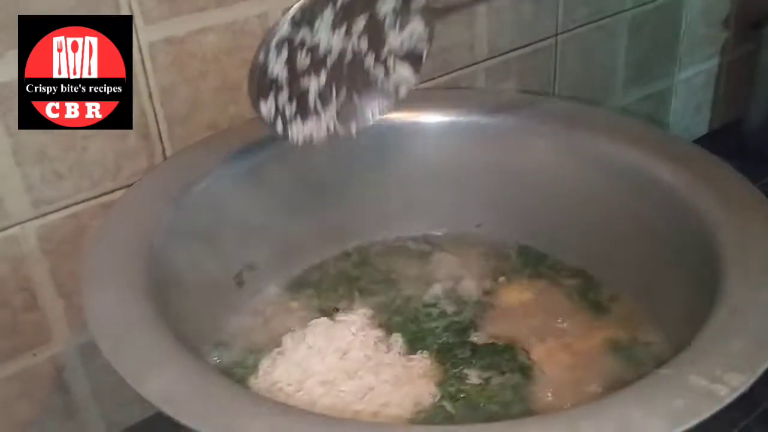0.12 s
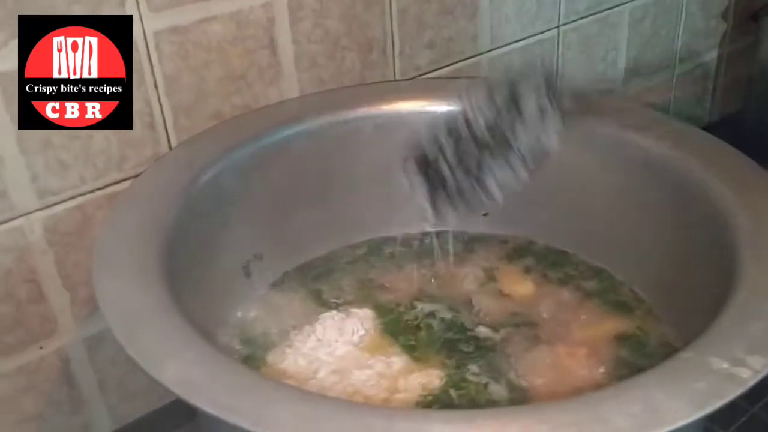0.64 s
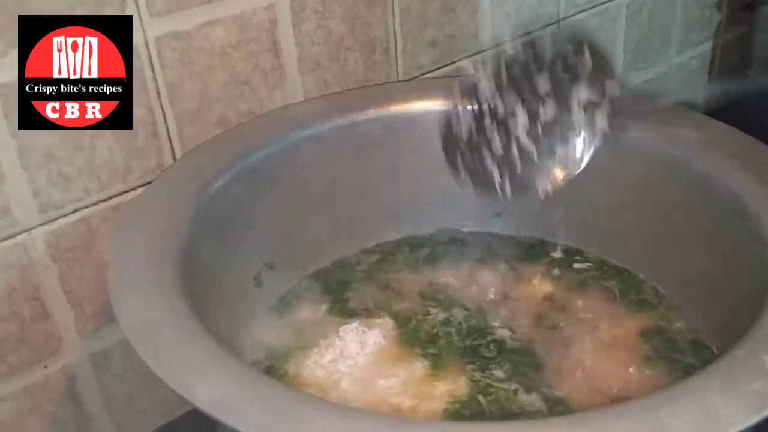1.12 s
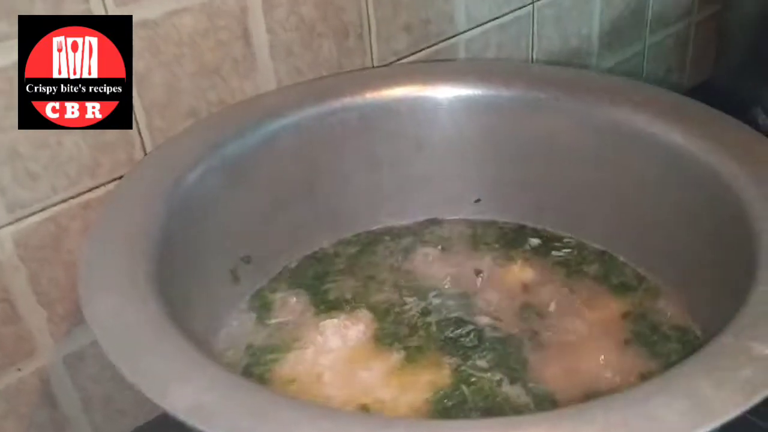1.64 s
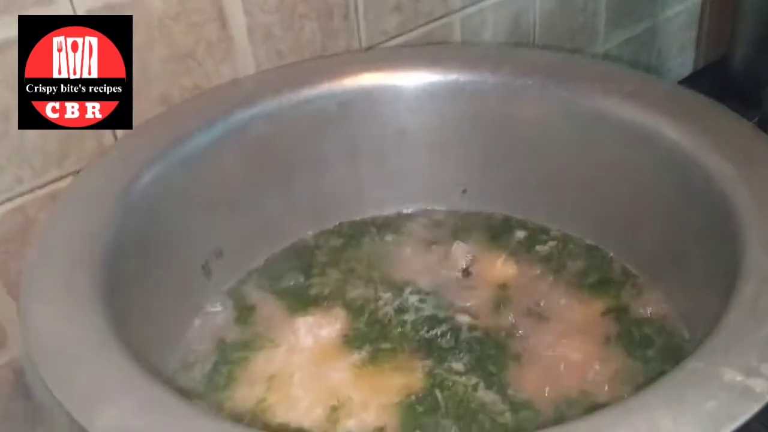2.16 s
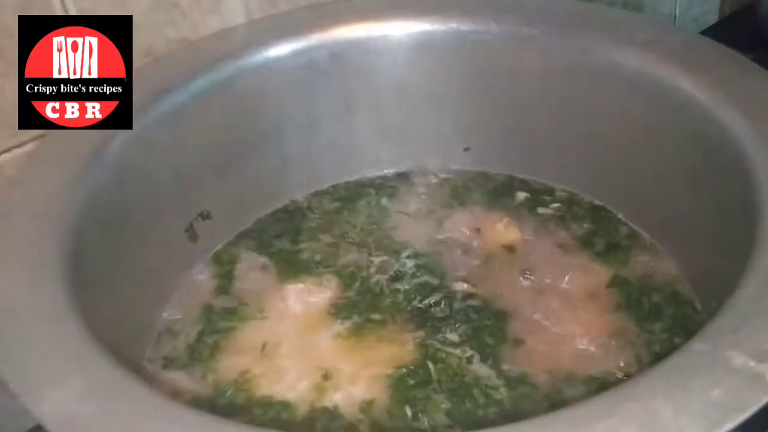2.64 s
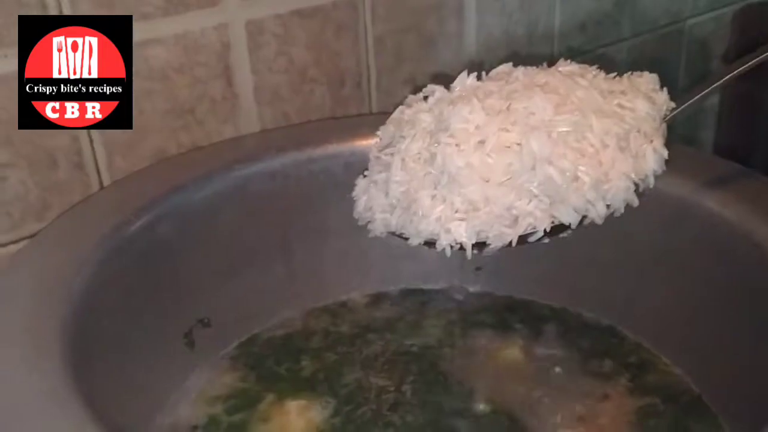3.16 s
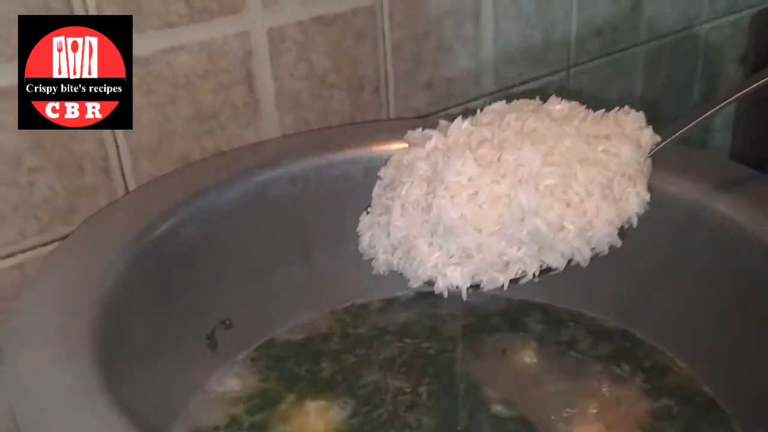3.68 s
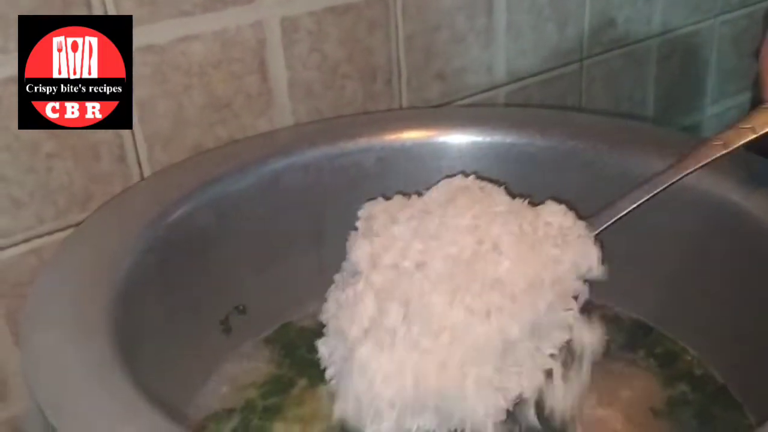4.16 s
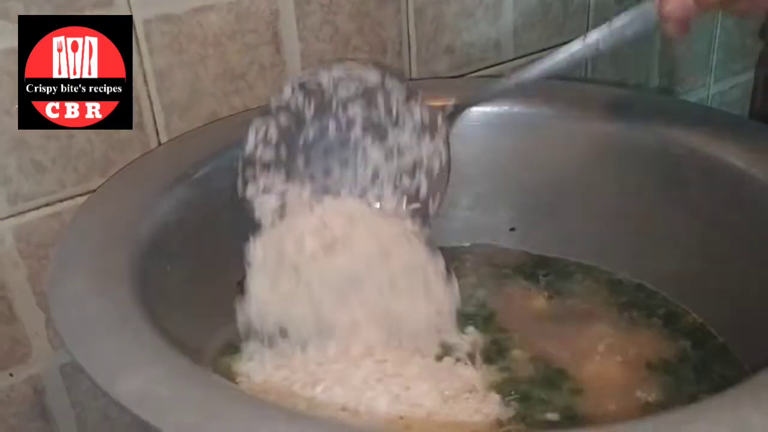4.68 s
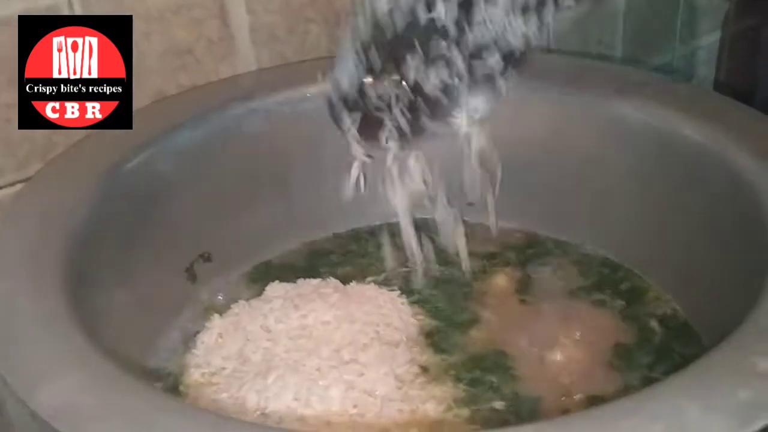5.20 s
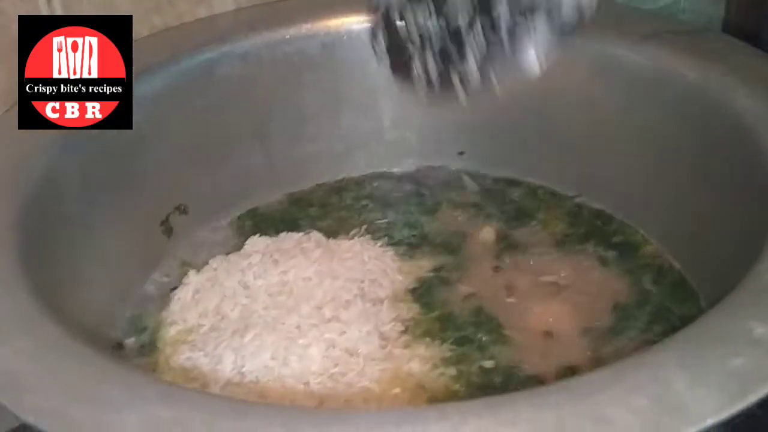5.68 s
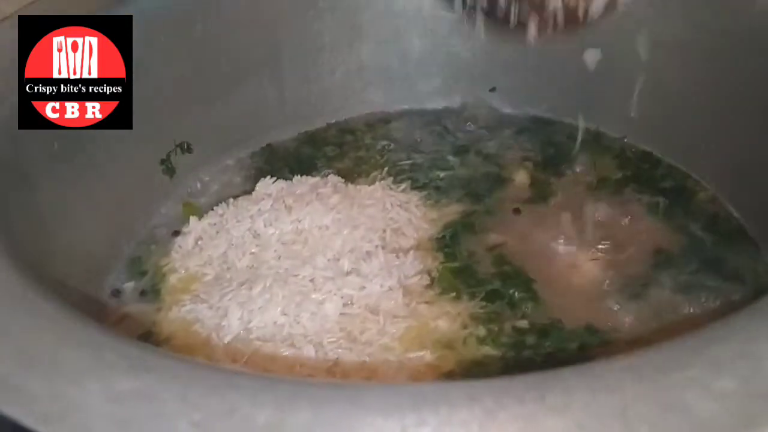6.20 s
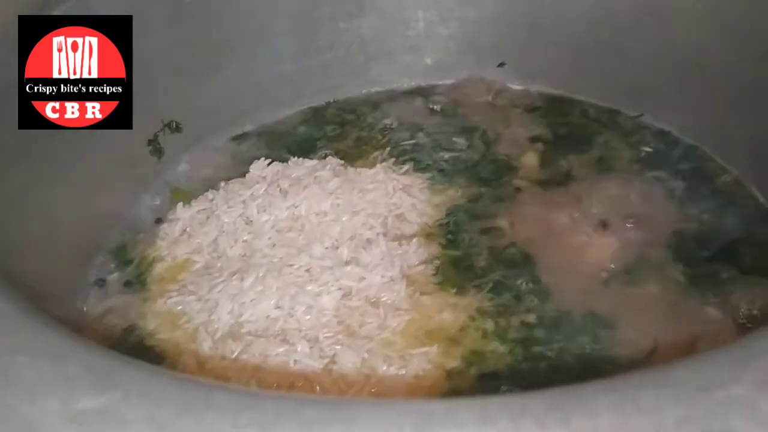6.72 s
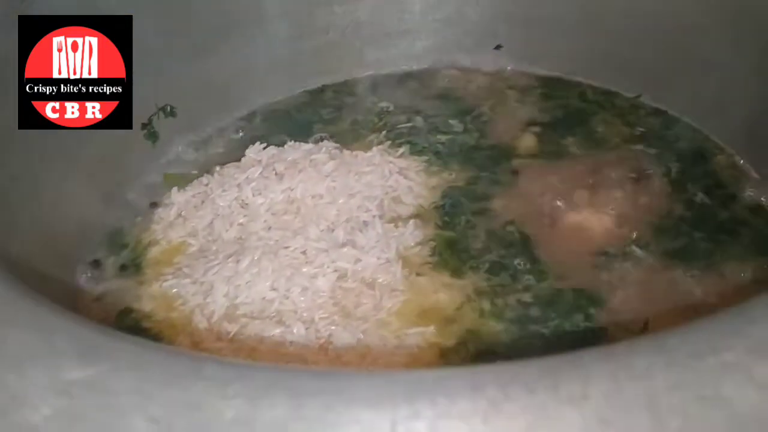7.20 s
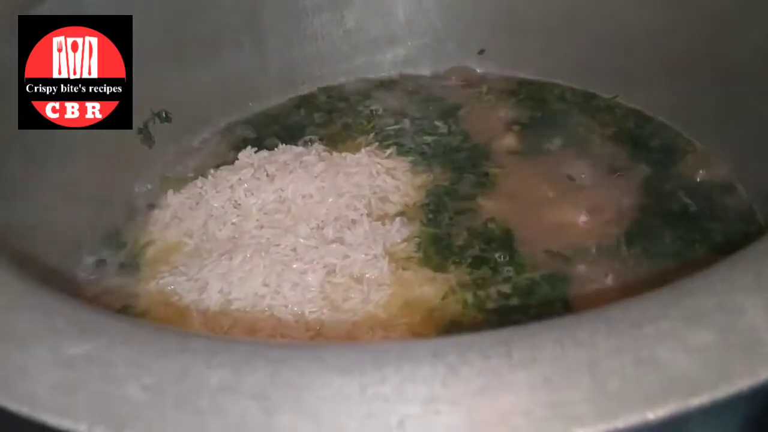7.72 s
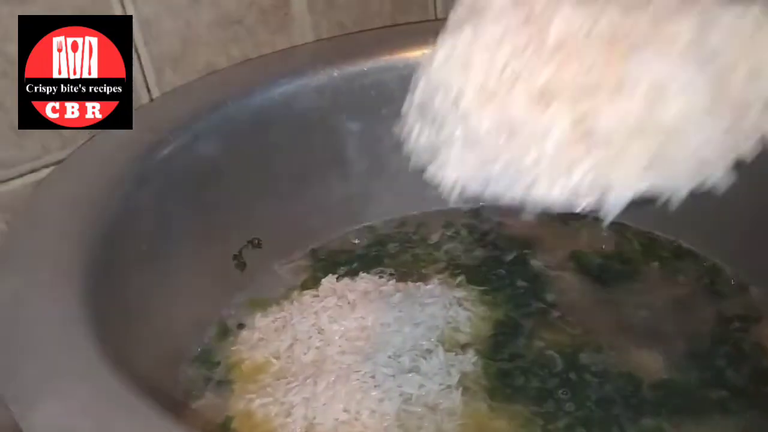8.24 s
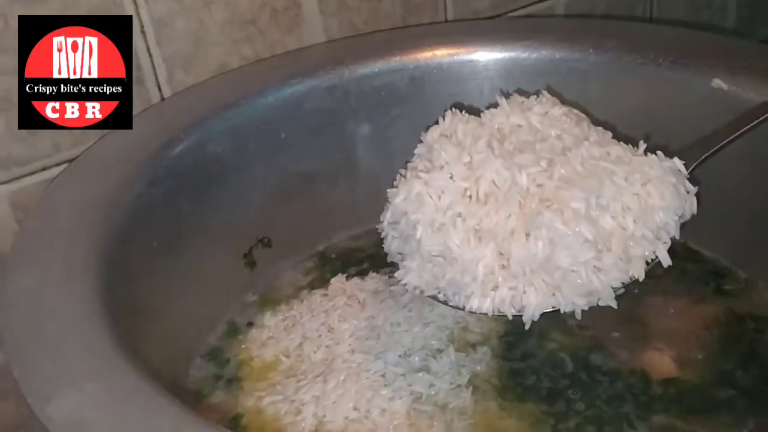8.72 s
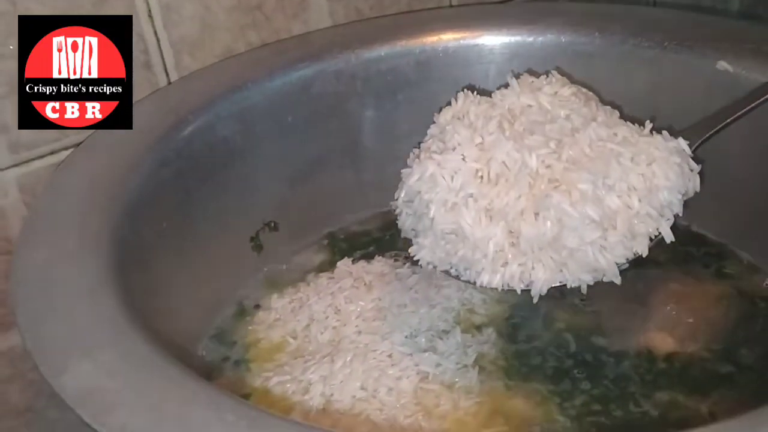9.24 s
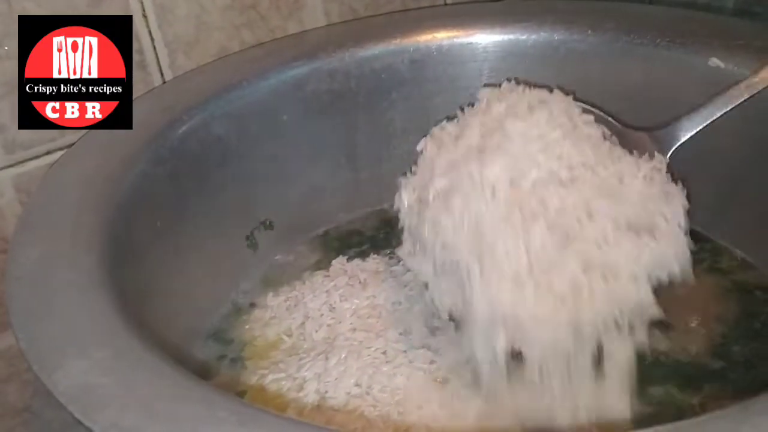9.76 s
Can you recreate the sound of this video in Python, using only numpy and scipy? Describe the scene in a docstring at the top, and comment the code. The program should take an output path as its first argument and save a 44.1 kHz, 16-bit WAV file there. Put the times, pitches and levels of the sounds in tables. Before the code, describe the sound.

A close microphone in a tiled kitchen hears a steady soft gas-flame roar and a low 100 Hz motor hum with moving air. Small rising plops of rice in broth come at 0.35-0.75 s. At 0.93 and 1.15 s a ladle raps a wide metal pot, very loud, bright and long-ringing with beating overtones; weaker touches follow until 1.5 s. At 2 s a sharp knock on a bowl, a plop, then from 2.3 to 3 s grainy scraping, booming and rough squeaks. Two dull thumps bump the microphone at 3.3 s. Rice slides off with dry hisses around 4.2-4.8 and 5.3-5.5 s, with a thin metallic rub. The hum dies quickly after 5.55 s. Rapid loud clangs ring from 5.8 to 6.4 s, air fading afterwards. Another bowl knock and scrape come at 7.0-7.9 s, ending abruptly. Quiet flame, ticking grains, faint plops, a brief low tone and a small spill finish by 9.9 s.

```python
"""A wide metal pot simmers on a gas burner in a tiled kitchen; a ladle raps its rim and beating modes ring out.
The flame is coloured noise; a motor nearby adds hum, narrow noise and moved air, then runs down.
The ladle digs rice from a bowl, knocks and drags on its wall: noise cracks, damped modes and stick-slip booms.
Rice hisses and ticks as random clicks and noise, clumps plop as rising sines; thumps reach the microphone's body.
The recorder's limiter ducks the whole kitchen under the loud raps."""
import sys
import numpy as np
from scipy import signal
from scipy.fft import rfft, irfft, next_fast_len
from scipy.io import wavfile
from scipy.ndimage import uniform_filter1d, map_coordinates

SR = 44100
rng = np.random.default_rng(int(sys.argv[2]) if len(sys.argv) > 2 else 0)


def linear_from_db(decibels):
    """Turn decibels (scalar or array-like) into linear amplitude factors; 0 gives 1."""
    return 10 ** (np.asarray(decibels, float) / 20)


def digitize_waveform(pressure):
    """Quantize a signal to 16-bit integers and store it at the path in sys.argv[1].

    Rows of a 2-D input are taken as channels; values are limited to [-1, 1].
    """
    field = np.atleast_2d(pressure).T
    bounded = np.clip(field, -1, 1)
    quanta = np.round(bounded * 32767).astype(np.int16)
    wavfile.write(sys.argv[1], SR, quanta)


N = 435266


def rms_one(x):
    """Scale to rms 1."""
    return x / np.sqrt(np.mean(x ** 2) + 1e-20)


def gains(*tables):
    """Level columns as gains in time, silent outside the tables."""
    t, out = np.arange(N) / SR, 0
    for rows in tables:
        s, *columns = np.transpose(rows)
        inside = (t >= s[0]) * (t <= s[-1])
        out = out + np.array([linear_from_db(np.interp(t, s, level_db)) * inside for level_db in columns])
    return out


def colour(x, spectrum):
    """Give a dense signal a spectrum, interpolated over log frequency; rms 1."""
    hz, level_db = np.transpose(spectrum)
    size = next_fast_len(len(x))
    log_hz = np.log(np.maximum(np.arange(size // 2 + 1) * SR / size, 1))
    shape = linear_from_db(np.interp(log_hz, np.log(hz), level_db))
    return rms_one(irfft(rfft(x, size) * shape, size)[:len(x)])


def noise(count=N):
    """White noise."""
    return rng.standard_normal(count)


def drift(rate):
    """Slow chance from normal knots of spread 1, rate knots per second."""
    knots = rng.standard_normal(400)
    return map_coordinates(knots, [np.arange(N) / SR * rate], order=3, mode="mirror")


def flutter(depth_db, per_s, count, size):
    """An uneven gain of its own for each mode; mean power over all modes 1."""
    knots = rng.standard_normal((count, 100))
    at = np.arange(size) / SR * per_s
    gain = linear_from_db(depth_db * np.array([np.interp(at, np.arange(100), row) for row in knots]))
    return gain / np.sqrt(np.mean(gain ** 2))


def resonate(x, hz, width_hz):
    """A resonance with gain about 1 on top."""
    r = np.exp(-np.pi * width_hz / SR)
    feedback = [1, -2 * r * np.cos(2 * np.pi * hz / SR), r * r]
    return signal.lfilter([(1 - r * r) / 2, 0, (r * r - 1) / 2], feedback, x)


def narrow_noise(hz, width_hz, count=N):
    """Noise twice through one resonance; rms 1."""
    return rms_one(resonate(resonate(noise(count), hz, width_hz), hz, width_hz))


def dying(t60, seconds):
    """An exponential fall of 60 dB in t60."""
    return linear_from_db(-60 * np.arange(round(seconds * SR)) / SR / t60)


def swell(s, rise_s, fall_s):
    """A gain that climbs 20 dB in rise_s to 1 at time s and falls 20 dB in fall_s."""
    t = np.arange(N) / SR - s
    return linear_from_db(-20 * np.where(t < 0, -t / rise_s, t / fall_s))


def grains(per_s, spread_db):
    """Random clicks of uneven size and sign."""
    sizes = linear_from_db(spread_db * np.minimum(rng.exponential(1, N), 5)) * rng.choice([-1, 1], N)
    return sizes * (rng.random(N) < per_s / SR)


def add(out, s, x):
    """Mix x into out from time s."""
    i = round(s * SR)
    out[i:i + len(x)] += x[:N - i]


def kitchen(x, t60, level_db):
    """Tiled walls: a dense tail after a 5 ms gap, duller than the source."""
    tail = signal.lfilter([.5], [1, -.45], noise(SR // 2)) * dying(t60, .5)
    tail = np.r_[np.zeros(SR // 200), tail / np.sqrt(np.sum(tail ** 2))]
    return x + linear_from_db(level_db) * signal.oaconvolve(x, tail)[:N]


# the motor's hum, running down after the last row: time_s, level_db
MOTOR_HUM = [(0, -31), (1.0, -32), (1.9, -31.5), (2.601, -28), (3.4, -25), (4.5, -25), (5.55, -26.5)]
# the wavering tone swells again alone: time_s, level_db
TONE_RETURNS = [(9.6, -56), (9.74, -29), (9.87, -34)]
# level of the moved air: time_s, level_db
MOVED_AIR = [(0, -33.5), (1.8, -31), (3.0, -32.5), (3.5, -35), (4.3, -34), (5.1, -35.5), (5.55, -27.5),
             (5.9, -33.5), (6.3, -25.5), (6.65, -43)]
# spectrum of the moved air: frequency_hz, density_db (per Hz)
AIR_SPECTRUM = [(24, -59), (40, -14), (68, -9), (103, 7), (179, 3.5), (218, -7.5), (350, -14), (438, -4),
                (817, -19), (1600, -10.5), (2330, -4.5), (3930, -24.5), (5580, -23.5), (8110, -43),
                (15500, -38)]


def motor():
    """A magnetic hum with a wavering tone and a whine, dying once switched off, and moved air."""
    s, hum_db = np.transpose(MOTOR_HUM)
    t = np.arange(N) / SR
    run_down_db = 63 * np.maximum(t - s[-1], 0)   # 63 dB per second
    running = linear_from_db(np.interp(t, s, hum_db) - run_down_db)
    hum_hz = 100.1 + 0.86 * drift(6)
    hum = np.sin(2 * np.pi * np.cumsum(hum_hz) / SR) * linear_from_db(0.74 * drift(18))
    whine = linear_from_db(-19) * narrow_noise(2316, width_hz=39)
    tone_gain = running * linear_from_db(-8.5) + gains(TONE_RETURNS)[0]
    tone = tone_gain * narrow_noise(169.74, width_hz=9.3)
    air = gains(MOVED_AIR)[0] * colour(noise(), AIR_SPECTRUM)
    return running * (hum + whine) + tone + air


# flame and simmer: time_s, level_db
BURNER_LEVEL = [(0, -35), (.7, -30.5), (2.1, -33.5), (2.55, -26.5), (3.05, -34), (3.4, -31), (5.6, -30),
                (6.9, -35), (7.45, -29.5), (8.3, -34), (9.87, -32.5)]
# spectrum of the roar: frequency_hz, density_db (per Hz)
FLAME_SPECTRUM = [(18, -89), (30, -30), (69, -32), (88, -2.5), (164, -1), (213, -6), (324, 0.5), (420, -7),
                  (1260, -10.5), (2300, -14), (2690, -12), (3320, -28), (6210, -36.5), (8500, -44.5),
                  (15500, -34.5)]
# faint whistles of the gas jets: pitch_hz, width_hz (of each of two passes), level_db
WHISTLES = [(2717, 37, -53), (3073, 120, -52.5), (6150, 53, -62)]


def burner():
    """The flame's roar, noise that flickers slightly, and its whistles, narrow noise."""
    roar = gains(BURNER_LEVEL)[0] * linear_from_db(0.9 * drift(9)) * colour(noise(), FLAME_SPECTRUM)
    return roar + sum(linear_from_db(db) * narrow_noise(hz, width_hz) for hz, width_hz, db in WHISTLES)


# thin fall of grains: time_s, level_db
TRICKLE = [(0, -46), (.9, -49.5), (1.6, -46.5), (3.04, -51.5), (3.06, -76), (3.3, -48), (4.0, -46.5),
           (5.25, -51), (5.8, -51), (7.0, -50), (8.5, -50), (9.87, -49.5)]
# spills, many grains at once: height_s, level_db, rise_s, fall_s (rise and fall over 20 dB)
SPILLS = [(.48, -48, 0.064, 0.46), (3.40, -58, .2, 0.41), (4.13, -49, .03, 0.16), (4.24, -39.5, 0.1, 0.38),
          (4.60, -47, 0.034, 0.13), (4.74, -38, 0.17, 0.27), (5.30, -40, 0.018, 0.11),
          (5.37, -39, 0.078, 0.089), (5.51, -39, 0.012, 0.37), (9.83, -45.5, 0.049, 0.16)]
# single grains ticking on metal: start_s, level_db, centre_hz
TICKS = [(.573, -26, 5000), (1.536, -26, 3500), (3.192, -33, 5140), (3.266, -33, 5200), (3.74, -26.5, 5470),
         (4.220, -28, 12500), (4.497, -36, 12500), (4.733, -24, 6500), (4.898, -27, 4770),
         (5.291, -37, 9000), (5.360, -27, 12500), (5.417, -41, 12000), (8.625, -38, 4850),
         (8.692, -40, 5600), (8.796, -38, 5100), (8.919, -33, 4870), (9.575, -39, 4700), (9.652, -35, 4960),
         (9.715, -35, 5000), (9.776, -36, 5000), (9.828, -31, 5000)]
# clumps dropping in the broth: start_s, peak_db, pitch_hz (at the start)
PLOPS = [(0.351, -22.5, 930), (0.572, -26, 910), (0.609, -15.5, 884), (0.651, -23.5, 940),
         (0.731, -23, 964), (2.088, -17, 960), (8.387, -38, 1020), (8.916, -36, 1250), (9.096, -33, 1240),
         (9.506, -34, 1010), (9.656, -26, 900)]
# spectrum of sliding grains: frequency_hz, density_db (per Hz)
SLIDE_SPECTRUM = [(1470, -36), (2500, -16.5), (3370, 1), (4080, -8), (5490, -1.5), (8100, -20),
                  (9580, -23.5), (12400, -13.5), (15500, -28)]


def rice():
    """Grains hiss off the ladle, some tick alone; clumps plop, rising a little in pitch."""
    patter = grains(4000 * linear_from_db(3 * drift(25)), spread_db=3.8)
    spilling = sum(linear_from_db(db) * swell(s, rise_s, fall_s) for s, db, rise_s, fall_s in SPILLS)
    flow = gains(TRICKLE)[0] + spilling
    tick = dying(t60=.035, seconds=0.054)
    strays = np.abs(linear_from_db(-52.5) * grains(per_s=12, spread_db=1.6))
    stray_gain = signal.oaconvolve(strays, tick)[:N]
    out = flow * colour(patter, SLIDE_SPECTRUM) + stray_gain * colour(noise(), SLIDE_SPECTRUM)
    for s, level_db, hz in TICKS:
        grain = rms_one(resonate(noise(len(tick)), hz, width_hz=.15 * hz))
        add(out, s, linear_from_db(level_db) / 2 * tick * grain)   # halved, as noise peaks well above its rms
    t = np.arange(SR // 10) / SR
    for s, peak_db, hz in PLOPS:
        add(out, s, linear_from_db(peak_db) * np.sin(2 * np.pi * hz * t * (1 + 0.79 * t)) * dying(0.061, .1))
    return out


# raps on the rim: start_s, level_db, spot (0-2), crack_db, ring_left (share of earlier ringing kept)
RAPS = [(0.9326, 12, 0, -9.5, .9), (1.146, 12, 0, -12, 0.24), (1.298, -2.5, 2, -36, 1),
        (1.476, -22, 2, -33, 0.94), (1.536, -28, 2, -34, 0.35), (5.784, 11, 1, -11.5, .9),
        (5.958, 9, 2, -4, 0.22), (6.02, 4, 2, -19, 0.19), (6.069, 1.5, 2, -20, 0.48),
        (6.142, 12.5, 2, -3, 0.43), (6.203, -10, 2, -11, 0.6), (6.3780, -10, 2, -20.5, 0.48)]
# pot modes: pitch_hz, spot_0_db, spot_1_db, spot_2_db (all relative), t60_s (before a common stretch)
POT_MODES = [(140, -34, -30, -24, 0.18), (320, -34, -28, -22, 0.18), (982, -17.5, -18, -21, 1.15),
             (1217, -26, -29, -22, 0.8), (1349, -21, -31, -35, 0.91), (1523, -23, -30, -25, 0.9),
             (1647, -11, -14, -17, 1.3), (1760, -20, -21, -33, 0.84), (1820, -34, -30, -23, .8),
             (1873, -17, -14, -24, 1.05), (1900, -18, -15, -27, 1.05), (2073, -32, -33, -35, 0.8),
             (2215, -16, -14, -15, 0.9), (2290, -21, -26, -16, 0.85), (2390, -26, -33, -30, 0.85),
             (2511, -19, -23, -29, 0.95), (2606, -28, -32, -38, 0.75), (2686, -31, -40, -35, 0.74),
             (2791, -26, -25, -38, 0.73), (2990, -31, -32, -28, 0.72), (3381, -38, -55, -38, 0.69),
             (3825, -48, -49, -42, 0.67), (4325, -47, -48, -40, 0.64), (4858, -34, -30, -40, 0.62),
             (5128, -33, -30, -41, 0.61), (5421, -32, -41, -39, 0.6), (5652, -46, -55, -52, 0.59),
             (5852, -45, -53, -52, 0.59), (6013, -46, -48, -40, 0.58), (6646, -36, -44, -49, 0.57),
             (7300, -52, -55, -44, 0.55), (7992, -54, -52, -46, 0.54), (8710, -53, -55, -49, 0.52),
             (9475, -52, -53, -49, 0.51), (10280, -66, -64, -53, 0.5), (11080, -62, -55, -51, 0.49),
             (11940, -57, -50, -52, 0.48), (12831, -50, -51, -57, 0.47), (13760, -59, -61, -54, 0.46)]
# the pot's many weak modes: frequency_hz, density_db (per Hz)
CROWD_SPECTRUM = [(300, -48), (800, -27), (1000, 3.5), (1400, -13), (2200, 4.5), (2900, -1), (3500, -25),
                  (4100, -17), (5200, -16.5), (6000, -32), (6500, -47), (7000, -21.5), (9000, -36),
                  (12500, -30), (15500, -34)]
# level of the weak modes at spots 0, 1, 2: level_db (relative to the rap)
CROWD_DB = [-26, -27, -29]
# spectrum of metal contact: frequency_hz, density_db (per Hz)
CLATTER_SPECTRUM = [(290, -29), (500, -20), (696, -12.5), (1510, -6.5), (2070, -10.5), (2360, -12),
                    (2720, -4), (3150, -8.5), (3630, -22), (3960, -16.5), (5750, -14), (8120, -34),
                    (15500, -31)]


def pot():
    """Each rap drives the modes as its spot allows and damps earlier ones; detuned twins make modes beat."""
    out, t = np.zeros(N), np.arange(SR) / SR
    count = len(POT_MODES)
    detuning = rng.uniform(.005, .013, count) * rng.choice([-1, 1], count)   # share of the pitch
    split_hz = np.minimum(np.array(POT_MODES)[:, 0], 2500) * detuning
    for s, level_db, spot, crack_db, _ in RAPS:
        rap = linear_from_db(CROWD_DB[spot]) * colour(noise(SR), CROWD_SPECTRUM) * dying(1.0, 1)
        luck = rng.standard_normal((count, 3))
        # each mode's level swells and fades slowly at random
        swells = flutter(depth_db=3.2, per_s=10, count=count, size=SR)
        for (hz, *spot_db, t60), split, (size, phase, twin_phase), uneven in zip(POT_MODES, split_hz, luck, swells):
            twin_share = .2 if hz < 1800 else .55   # the low modes have weaker twins
            mode = np.sin(2 * np.pi * hz * t + 9 * phase)
            twin = np.sin(2 * np.pi * (hz + split) * t + 9 * twin_phase)
            hard_db = 2.5 * max(np.log2(hz / 2200), -1.2)   # a hard contact favours the high modes
            mode_gain = linear_from_db(spot_db[spot] - 5.5 + hard_db + size)
            rap += mode_gain * (mode + twin_share * twin) * uneven * dying(1.196 * t60, 1)
        for later_s, *_, ring_left in RAPS:
            if s < later_s < s + 1:
                rap[round((later_s - s) * SR):] *= ring_left
        add(out, s, linear_from_db(level_db) * rap * (1 - dying(0.0013, 1)))   # the contact lasts a moment
        crack = colour(noise(SR // 5), CLATTER_SPECTRUM) * dying(0.11, .2)
        add(out, s, linear_from_db(crack_db) * crack)
    return out


# knocks on the bowl: start_s, crack_db, crack_hz (centre), crack_width (share of centre, each of two passes),
# crack_t60_s, spot (0-1), ring_db, attack_s (of a 60 dB approach)
KNOCKS = [(1.9933, 2, 2320, .3, 0.1, 0, 6.5, 0.0017), (1.995, -23.5, 12500, 1, 0.23, 0, -40, .003),
          (2.2610, -16, 820, 0.22, 0.033, 0, -31, 0.0023), (2.4575, -13.5, 3590, 0.05, 0.11, 1, -20, 0.012),
          (2.466, -6.5, 706, 0.22, 0.03, 1, -30, 0.005), (2.5417, -20, 2160, .2, 0.072, 1, -22, 0.0068),
          (2.5669, -22, 1870, 0.23, 0.19, 1, -24, .002), (2.7467, -10, 2270, 0.54, 0.066, 0, -24, 0.0015),
          (2.757, -18, 2160, 0.14, 0.093, 0, -27, 0.0033), (2.90, -26, 1750, 0.45, 0.9, 1, -29, 0.12),
          (2.9675, -23, 2400, 0.33, 0.15, 1, -22, .004), (2.9925, -21.5, 1810, 0.56, 0.088, 1, -30, .003),
          (3.033, -13, 1730, 0.18, 0.99, 1, -29, .002), (7.0240, -4, 1970, 0.12, 0.069, 1, 3.5, 0.01),
          (7.024, -27, 12700, .6, 0.14, 1, -40, .004), (7.2260, -19.5, 1870, 0.24, 0.11, 1, -13.5, 0.0043),
          (7.226, -17, 5700, 0.89, 0.15, 1, -40, .004), (7.234, -18, 780, 0.41, 0.085, 1, -33, 0.013),
          (7.601, -16.5, 1673, 0.45, 0.44, 1, -30, 0.05), (7.7676, -29, 2200, 0.99, 0.19, 1, -28, 0.007),
          (7.814, -25.5, 1900, .7, 0.3, 1, -32, 0.029)]
# bowl modes: pitch_hz, spot_0_db, spot_1_db (relative), t60_s (before a common stretch)
BOWL_MODES = [(1007, -24, -31, .12), (1410, -25, -40, .2), (1850, -27, -15, .3), (2019, -11, -34, .42),
              (2085, -17, -15, .35), (2509, -21, -42, .22), (2750, -14, -28, .33), (3122, -29, -31, .3),
              (3525, -22, -25, .2), (3978, -44, -42, .13), (4460, -20, -36, .5), (4730, -40, -28, .3),
              (4925, -33, -31, .2), (5389, -40, -28, .25), (5593, -27, -38, .45), (5830, -17, -34, .42),
              (6121, -33, -28, .23), (6515, -23, -39, .45), (7600, -37, -35, .35), (8204, -43, -48, .2),
              (11750, -50, -48, .25)]
# moments when the sound of the knocks stops abruptly: start_s
KNOCK_STOPS = [3.047, 7.875]


def bowl():
    """Knocks: a crack of noise around its centre, shaken rice, and the beating modes."""
    out, t = np.zeros(N), np.arange(SR // 2) / SR
    for s, crack_db, crack_hz, crack_width, crack_t60, spot, ring_db, attack_s in KNOCKS:
        luck = rng.standard_normal((len(BOWL_MODES), 3))
        # loose grains on the bowl's wall roughen its ring
        rattle = flutter(depth_db=3.5, per_s=80, count=len(BOWL_MODES), size=len(t))
        crack = narrow_noise(crack_hz, crack_width * crack_hz, len(t)) * dying(crack_t60, .5)
        shaken = colour(noise(len(t)), CLATTER_SPECTRUM) * dying(1.17 * crack_t60, .5)
        knock = linear_from_db(crack_db) * (crack + linear_from_db(-6.5) * shaken)
        for (hz, *spot_db, t60), (size, phase, split), rough in zip(BOWL_MODES, luck, rattle):
            mode = np.sin(2 * np.pi * hz * t + 9 * phase)
            twin = 1.34 * np.sin(2 * np.pi * (hz + 22 * split) * t)
            # the pressed ladle takes most of the ring within some 30 ms
            fall = np.exp(-(t / .03) ** 2) + .07 * dying(2.9 * t60, .5)
            knock += linear_from_db(ring_db + spot_db[spot] + 2.0 * size) * (mode + twin) * fall * rough
        settling = dying(0.14, .5) + linear_from_db(-11) * dying(0.7, .5)   # grains settle
        knock += linear_from_db(crack_db - 16) * colour(noise(len(t)), SLIDE_SPECTRUM) * settling
        add(out, s, knock * (1 - dying(attack_s, .5)))
    out = kitchen(out, t60=0.3, level_db=-14)
    for s in KNOCK_STOPS:
        out[round(s * SR):round(s * SR) + SR] = 0   # for one second
    return out


# rate at which the dragged edge sticks and slips: time_s, rate_hz
SLIP_RATE = [(2.28, 286.3), (2.40, 304.7), (2.47, 333.2), (2.529, 323), (2.599, 339.2), (3.0, 320),
             (7.299, 286.2), (7.40, 310.4), (7.46, 327), (7.50, 351.6), (7.549, 303), (7.65, 320),
             (7.87, 309.5)]


def slips():
    """Stick and slip: a train at a wavering rate and of uneven size, with loose slips between."""
    s, rate_hz = np.transpose(SLIP_RATE)
    wavering_hz = np.interp(np.arange(N) / SR, s, rate_hz) * (1 + .06 * drift(40))
    cycles = np.cumsum(wavering_hz) / SR
    train = np.diff(np.floor(cycles), prepend=0) * linear_from_db(4.9 * noise())
    return rms_one(train) + linear_from_db(-4.5) * rms_one(grains(600, spread_db=1.0))


def boom(edge, hollow):
    """Slips ring in the hollow's resonances, each passed at double and single width; rms 1."""
    rings = [linear_from_db(db) * resonate(resonate(edge, hz, 2 * width), hz, width) for hz, width, db in hollow]
    return rms_one(sum(rings))


# ladle digging through the rice, one list per dig: time_s, low_boom_db, upper_boom_db, grains_db
DIGS = [
    [(2.28, -51, -48, -54), (2.38, -42, -33, -45), (2.42, -25, -26.5, -37), (2.47, -21, -22.5, -38),
     (2.52, -31, -29, -26.5), (2.59, -25, -38, -53), (2.65, -37, -33, -40), (2.76, -50, -48, -45),
     (2.884, -54, -53, -48), (3.008, -42, -51, -46), (3.047, -53, -56, -59)],
    [(7.29, -41, -50, -40), (7.335, -46, -49, -40), (7.355, -24, -33, -32), (7.41, -50, -27, -37),
     (7.455, -18, -28, -32), (7.49, -34, -31, -33), (7.51, -33, -25, -30.5), (7.59, -32, -30, -25.5),
     (7.62, -35, -30, -20.5), (7.702, -51, -43, -33), (7.826, -41, -37, -43), (7.875, -33, -49, -43)],
]
# lower hollow of the bowl: pitch_hz, width_hz, level_db (relative)
LOW_HOLLOW = [(165, 22, 1), (320, 85, -4)]
# upper hollow of the bowl: pitch_hz, width_hz, level_db (relative)
UPPER_HOLLOW = [(630, 206, 5), (1320, 220, -8)]
# squeal of the edge: time_s, pitch_hz
EDGE_SQUEAL = [(2.3, 5000), (2.553, 5400), (3.0, 5830), (7.402, 4670), (7.498, 4790), (7.55, 5400),
               (7.611, 5050), (7.66, 5500), (7.87, 5360)]
# spectrum of rubbed grains: frequency_hz, density_db (per Hz)
GRAIN_SPECTRUM = [(290, -42), (500, 2), (603, -18), (941, 4), (1200, -15), (1670, -11), (3430, 1),
                  (4020, -4), (5510, -3), (8120, -20), (15500, -20)]


def digging():
    """The ladle's edge stutters on the wall, booms and squeals; grains tick and stir the damped modes."""
    low, upper, rustle = gains(*DIGS)
    edge = slips()
    ticks = grains(2500 * linear_from_db(3 * drift(30)), spread_db=3)
    wall = sum(linear_from_db(.7 * spot_1_db) * resonate(ticks, hz, 90) for hz, _, spot_1_db, _ in BOWL_MODES)
    s, squeal_hz = np.transpose(EDGE_SQUEAL)
    carrier = np.sin(2 * np.pi * np.cumsum(np.interp(np.arange(N) / SR, s, squeal_hz)) / SR)
    squeal = carrier * rms_one(resonate(ticks, 44, 70))   # a rough band that follows the edge
    rubbed = linear_from_db(-4) * colour(ticks, GRAIN_SPECTRUM) + linear_from_db(-8) * rms_one(wall) + linear_from_db(-1) * squeal
    return low * boom(edge, LOW_HOLLOW) + upper * boom(edge, UPPER_HOLLOW) + rustle * rubbed


# bumps on the microphone's body: start_s, level_db, pitch_hz, decay_s (a third of the t60)
BUMPS = [(3.312, 0.5, 270, 0.0067), (3.32, -2.5, 203, 0.018)]


def bumps():
    """Dull, short thumps straight into the microphone: decaying sines cut after 2.5 cycles."""
    out, t = np.zeros(N), np.arange(SR // 10) / SR
    for s, level_db, hz, decay_s in BUMPS:
        thump = np.sin(2 * np.pi * hz * t) * dying(3 * decay_s, .1) * (t < 2.5 / hz)
        touch = np.sin(2 * np.pi * 1000 * t) * dying(0.013, .1)
        click = colour(noise(len(t)), CLATTER_SPECTRUM) * dying(0.037, .1)
        add(out, s, -linear_from_db(level_db) * thump)
        add(out, s - .001, -linear_from_db(level_db - 14.5) * touch)
        add(out, s, linear_from_db(level_db - 27) * click)
    return out


# a thin ring, metal rubbed on metal: height_s, level_db
RUBS = [(5.508, -26.5), (5.604, -34)]
# resonances of the rubbed metal: pitch_hz, width_hz, level_db (relative)
RUB_MODES = [(1900, 50, -7), (4405, 64, -3.5)]


def rub():
    """Fine friction into two narrow resonances; each stroke starts fast and dies away."""
    friction = grains(1500, spread_db=2.0)
    strokes = sum(linear_from_db(db) * swell(s, rise_s=0.0082, fall_s=0.2) for s, db in RUBS)
    return strokes * sum(linear_from_db(db) * rms_one(resonate(friction, hz, width)) for hz, width, db in RUB_MODES)


def scene():
    """All sources, one microphone."""
    ringing_pot = kitchen(pot(), t60=.6, level_db=-11)
    mix = motor() + burner() + rice() + ringing_pot + bowl() + digging() + bumps() + rub()
    return mix[None]


def roll_off(x):
    """The treble ends steeply here."""
    return signal.sosfilt(signal.butter(12, 15600, fs=SR, output="sos"), x)


def record(dry):
    """The microphone drops the deep bass; a limiter grips at once and lets go at a steady dB rate."""
    dry = signal.sosfilt(signal.butter(2, 75, "high", fs=SR, output="sos"), dry)
    release_db = 160 * np.arange(N) / SR   # 160 dB per second
    over_db = np.maximum(20 * np.log10(np.abs(dry[0]) + 1e-9), 0)
    held_db = np.maximum.accumulate(over_db + release_db) - release_db
    gain = linear_from_db(-uniform_filter1d(held_db, size=45))   # smoothed over 1 ms
    return roll_off(np.clip(dry * gain, -1, 1))


dry = scene()
out = record(dry)
digitize_waveform(out)
```